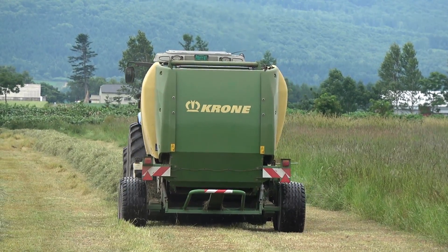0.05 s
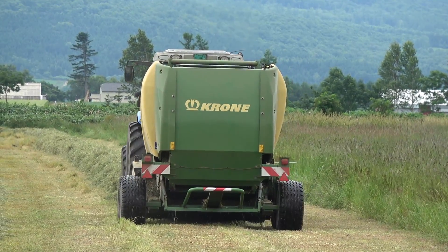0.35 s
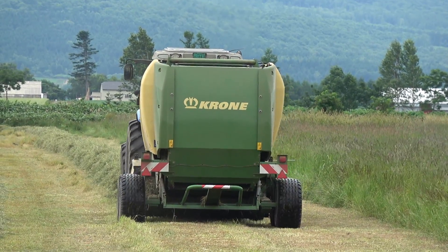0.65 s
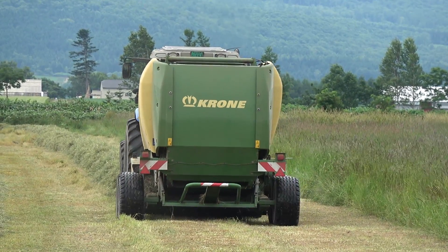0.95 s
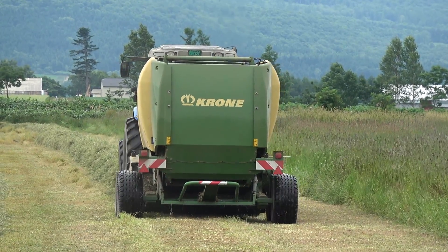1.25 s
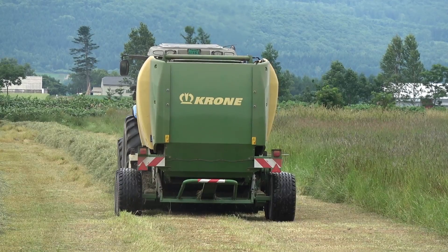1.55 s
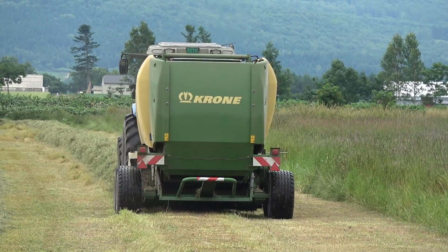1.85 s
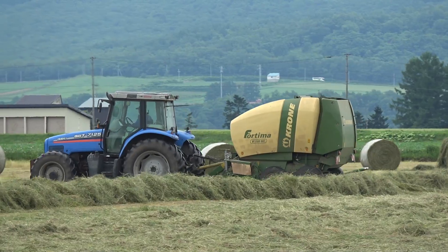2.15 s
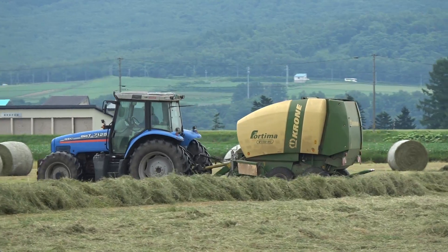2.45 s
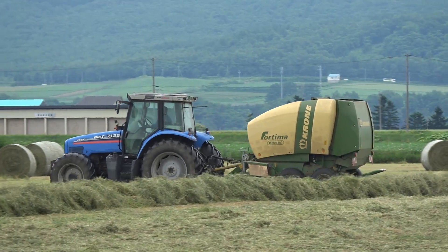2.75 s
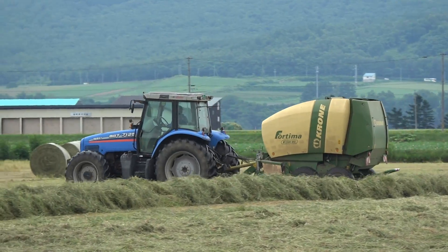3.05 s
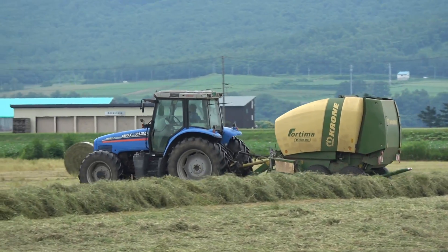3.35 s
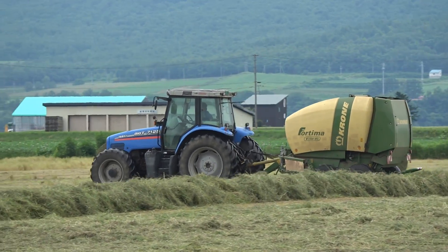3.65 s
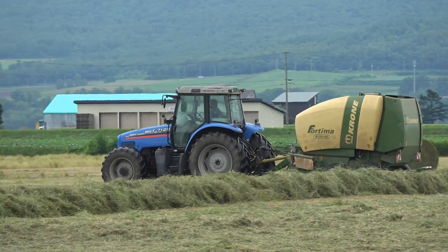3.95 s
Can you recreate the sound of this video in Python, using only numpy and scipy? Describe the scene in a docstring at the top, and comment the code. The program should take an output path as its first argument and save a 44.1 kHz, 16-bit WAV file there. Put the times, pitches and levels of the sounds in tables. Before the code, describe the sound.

A hay baler rattles in a fast, steady beat behind a droning tractor, with ringing steel and booming panels. After a sudden cut, the diesel runs more distantly with fan noise and a fading whine, while wind buffets the microphone.

```python
"""You hear steel clattering in a steady beat, rustling hay, a droning diesel and thumps of wind.
A six-cylinder tractor pulls a round baler, first heard from close behind, then, after a cut, from the
side and farther off. The baler's chain and slats rattle its frame and ring its steel; links jangle and
a panel booms. The diesel knocks each time a cylinder fires. Gusts buffet the two microphone ports."""
import sys
import numpy as np
from scipy import signal
from scipy.fft import rfft, irfft
from scipy.io import wavfile
from scipy.ndimage import uniform_filter1d, minimum_filter1d

SR = 44100
rng = np.random.default_rng(int(sys.argv[2]) if len(sys.argv) > 2 else 0)


def wrap_up_sound(samples):
    """Save the sound to the file named by the first command line argument, as 16-bit audio."""
    columns = np.atleast_2d(samples).T
    # keep every value between -1 and 1, then stretch to whole-number steps
    tamed = np.clip(columns, -1, 1)
    steps = np.round(tamed * 32767).astype(np.int16)
    wavfile.write(sys.argv[1], SR, steps)


N = 176400

CUT_S, RESUME_S = 2.018, 2.031  # the view from behind ends, the side view begins
FIRING_BEHIND_HZ, FIRING_SIDE_HZ = 99.05, 99.27  # cylinder firings per second

# Levels in the tables are relative: the functions set how loud each layer ends up.
# ringing notes of the steel chain and slats: f/Hz, width/Hz, level/dB
STEEL = [(2385, 45, -5.5), (4045, 60, -1), (4105, 60, -2), (4290, 170, -10), (4535, 45, -7),
         (5080, 120, -16), (8546, 20, -25), (9030, 40, -28)]
# stereo width of the side view: f/Hz, left-right difference/dB
WIDTH_SIDE = [(200, 12), (1200, -42), (2200, -26), (4000, -12.5), (5500, -10.5), (7000, -2), (9000, 0),
              (12000, 3), (15000, 0)]


def undb(db):
    """Turn decibels into a factor to multiply by."""
    return 10 ** (np.asarray(db) / 20)


def unit(x):
    """Scale a signal to an average power of 1."""
    return x / np.sqrt(np.mean(x ** 2))


def clock():
    """The time of each sample in seconds."""
    return np.arange(N) / SR


def curves(table):
    """Join a table's points with straight lines in time, one curve for each column after the first."""
    rows = np.array(table, float)
    return [np.interp(clock(), rows[:, 0], col) for col in rows.T[1:]]


def bins():
    """The frequency of each slot in the spectrum, at least 1 Hz."""
    return np.maximum(np.arange(N // 2 + 1) * SR / N, 1)


def colour(x, points):
    """Shape a sound's tone with a curve of points: f/Hz, level/dB."""
    hz, db = np.array(points, float).T
    return irfft(rfft(x) * undb(np.interp(np.log(bins()), np.log(hz), db)), N)


def split(x, hz):
    """The parts of a sound below and above a frequency."""
    low = irfft(rfft(x) / (1 + (bins() / hz) ** 6), N)
    return low, x - low


def ring(x, modes):
    """Make an object ring: each of its notes is pushed by the part of x near that pitch."""
    out = 0
    for hz, width, db in modes:
        pole = np.exp((2j * np.pi * hz - np.pi * width) / SR)  # a narrower note rings longer
        band = signal.butter(2, [.86 * hz, min(1.12 * hz, .45 * SR)], "band", fs=SR, output="sos")
        push = signal.sosfilt(band, x)
        out = out + undb(db) * unit(signal.lfilter([1], [1, -2 * pole.real, abs(pole) ** 2], push))
    return unit(out)


def walk(rate):
    """A smooth random drift of typical size 1; a higher rate in Hz wobbles faster."""
    return unit(irfft(rfft(rng.standard_normal(N)) * np.exp(-(bins() / rate) ** 2), N))


def grit(spread_db):
    """Dense tiny clicks of uneven size."""
    return unit(rng.standard_normal(N) * undb(spread_db * np.minimum(rng.exponential(size=N), 7)))


def hiss_band(hz, width_hz):
    """A band of noise whose centre follows the curve hz."""
    shape = np.exp(-np.log(2) * (2 * bins() / width_hz) ** 2)
    band = irfft(rfft(rng.standard_normal((2, N))) * shape, N)
    shift_up = np.exp(2j * np.pi * np.cumsum(hz) / SR)
    return unit(np.real((band[0] + 1j * band[1]) * shift_up))


def wavering_tone(hz, waver, rate):
    """A pure tone whose pitch drifts by about the fraction waver."""
    return np.sqrt(2) * np.sin(2 * np.pi * np.cumsum(hz * (1 + waver * walk(rate))) / SR)


def strikes(table, decay_s, column=1, rise_s=0.0037):
    """A loudness curve that jumps up and dies away at each time in a table."""
    loudness = np.zeros(N)
    for row in table:
        age = np.maximum(clock() - row[0], 0)
        loudness += undb(row[column]) * (1 - np.exp(-age / rise_s)) * np.exp(-age / decay_s)
    return loudness


def stereo(mid, side, width):
    """Left and right: both get mid, while side is shaped by width, then added or taken away."""
    return mid + colour(side, width) * np.array([[1], [-1]])


def wind(gusts, spectrum, gain_db, shared, flutter_db):
    """Swirls of air thump each microphone port; strong gusts swell the deep bass most."""
    level_db, pan_db = curves(gusts)
    swirls = np.sqrt(1 - shared) * rng.standard_normal((2, N)) + np.sqrt(shared) * rng.standard_normal(N)
    low, high = split(unit(colour(swirls * undb(flutter_db * walk(40)), spectrum)), hz=110)
    swell = np.sqrt(uniform_filter1d((low + high) ** 2, SR // 8, axis=1))
    high = high.mean(axis=0) + 0.29 * (high - high.mean(axis=0))  # more alike at both ports
    usual_db = np.median(np.array(gusts)[:, 1])
    air = low / swell + high * undb(2.5 - 0.21 * (level_db - usual_db))
    return air * undb(level_db + gain_db + 0.43 * np.array([pan_db, -pan_db]))


def pickup():
    """Wads of hay swish into the baler, a little differently in each ear."""
    # swishes of hay: t/s, level/dB
    swishes = [(2.2, -70), (2.73, -60), (3.42, -62), (3.51, -60), (3.9, -66)]
    hiss = [hiss_band(np.full(N, 7500), width_hz=4500) for _ in range(2)]
    return stereo(*hiss, WIDTH_SIDE) * uniform_filter1d(strikes(swishes, decay_s=0.063), SR // 30)


def drive_line():
    """The turning drive line makes a hum and a rough whine that fade once the tractor has gone by."""
    # loudness of the drive line: t/s, hum/dB, whine/dB
    levels = [(2.03, -60, -50), (2.25, -52.5, -50), (2.62, -53, -52), (2.9, -63, -59), (4, -65, -68)]
    hum_db, whine_db = curves(levels)
    hum = wavering_tone(hz=705, waver=.008, rate=25) * undb(hum_db + 2 * walk(16))
    whine = undb(whine_db) * hiss_band(np.full(N, 2150), width_hz=230)
    return hum + whine


def engine_drone(firing_hz, column, waver):
    """Low tones of the engine and drive, all locked to the turning crankshaft."""
    # engine tones: multiple of the firing rate, level behind/dB, level from the side/dB
    tones = [(1, -44, -43), (4 / 3, -39.5, -42), (7 / 3, -43, -51), (3.5, -50, -60), (6, -64, -63),
             (7, -60, -62), (9, -64, -63), (11.5, -56, -63)]
    phase = 2 * np.pi * np.cumsum(firing_hz * (1 + waver * walk(5.7))) / SR
    out = 0
    for row in tones:
        strength = np.sqrt(2) * undb(row[column] + 2 * walk(7.5))
        out += strength * np.sin(row[0] * phase + rng.uniform(0, 2 * np.pi))
    return out


def diesel_knock(firing_hz, decay):
    """A pulse at every firing, dying away before the next; each cylinder has its own strength."""
    firings = np.cumsum(firing_hz * (1 + 0.0012 * walk(3.4))) / SR
    cylinders = undb(2.9 * rng.standard_normal(size=6))
    return unit(np.exp(-(firings % 1) / decay) * cylinders[firings.astype(int) % len(cylinders)])


def tractor():
    """From the side: the diesel knocks over fan and machine noise, changing tone as the rig moves by."""
    # tone of the diesel's noise: f/Hz, level/dB
    diesel_tone = [(190, -39), (330, -18), (427, -8), (560, -2.5), (692, -5.5), (800, -5.5), (1040, -1),
                   (1680, -5.5), (2170, -5.5), (3150, -10), (4780, -14.5), (10500, -34.5), (15500, -37.5)]
    # the passing rig in four bands, low to high: t/s, body/dB, middle/dB, upper/dB, treble/dB
    passing = [(2.03, -0.5, -2, 8, -0.5), (2.4, -1, -4, 6.5, -0.5), (2.62, -1, -5, 5.5, -1.5),
               (2.85, -1.5, -2, 5, 0), (3.15, -1, 1.5, -4, -0.5), (3.45, -0.5, 2.5, 0, -2),
               (3.7, -0.5, 2, 1, -1.5), (4, 0.5, 3, -2, -2)]
    # two gliding bands of hiss: t/s, lower f/Hz, lower level/dB, upper f/Hz, upper level/dB
    glide = [(2.03, 2560, -63, 4690, -57), (2.45, 2550, -56.5, 4720, -57), (2.8, 2695, -54, 4730, -67),
             (3.1, 2780, -55.5, 4750, -70), (3.4, 2196, -52.5, 5203, -56), (3.7, 2195, -57.5, 5400, -62.5),
             (4, 2100, -55.5, 6100, -55.5)]
    # two bands of fan roar: t/s, upper f/Hz, upper level/dB, lower f/Hz, lower level/dB
    fan_bands = [(2.03, 1200, -58, 800, -57), (2.4, 1150, -53, 800, -55), (2.55, 1082, -49, 800, -57),
                 (2.8, 1078, -50.5, 820, -52), (3.05, 1104, -62, 850, -54), (3.5, 1130, -60, 950, -66),
                 (3.75, 1082, -50.5, 1020, -54), (4, 1227, -48, 980, -57)]
    body_db, middle_db, upper_db, treble_db = curves(passing)
    low_hz, low_db, high_hz, high_db = curves(glide)
    fan_hz, fan_db, roar_hz, roar_db = curves(fan_bands)
    knock = diesel_knock(FIRING_SIDE_HZ, decay=.4)
    beat = unit(np.sqrt(1 + .18 * knock ** 2)) * undb(.45 * walk(30))
    pair = []
    for _ in range(2):  # mid, then side
        body, rest = split(unit(colour(grit(spread_db=-1.0) * beat, diesel_tone)), hz=1150)
        middle, rest = split(rest, hz=2000)
        upper, treble = split(rest, hz=3400)
        diesel = (body * undb(body_db) + middle * undb(middle_db - 4.0)
                  + upper * undb(upper_db - 7.0) + treble * undb(treble_db + 1.0))
        hiss = undb(low_db + 3.5) * hiss_band(low_hz, width_hz=1080)
        hiss += undb(high_db) * hiss_band(high_hz, width_hz=890)
        fan = undb(fan_db) * hiss_band(fan_hz, width_hz=390)
        fan += undb(roar_db) * hiss_band(roar_hz, width_hz=250)
        pair.append(undb(-42.5) * diesel + beat * (hiss + fan))
    return stereo(*pair, WIDTH_SIDE) + engine_drone(FIRING_SIDE_HZ, column=2, waver=0.00093)


def panel_booms(shake):
    """Shaking keeps the bale chamber ringing; now and then its big panel booms on an unsteady note."""
    # notes of the chamber and its panels: f/Hz, width/Hz, level/dB
    panels = [(136, 20, -2), (195, 35, 0), (234, 16, -2), (266, 20, -2), (703, 35, -7), (754, 20, -8),
              (850, 50, -11), (1143, 30, -8), (1890, 30, -19)]
    # booms of the big panel: t/s, level/dB
    booms = [(.025, -26), (.725, -29), (.985, -27), (1.16, -22.5), (1.485, -25.5), (1.615, -28),
             (1.92, -25)]
    chamber = undb(-34.5) * ring(rng.standard_normal(N) * shake, panels)
    note = wavering_tone(hz=234, waver=.02, rate=10)
    return chamber + undb(2.5) * note * strikes(booms, decay_s=.04, rise_s=.02)


def jangles():
    """Links strike and bounce twice; each contact rings three steel notes, a little off pitch."""
    # jangling strokes of the chain: t/s, low note/dB, middle note/dB, high note/dB
    strokes = [(.006, -37, -37, -39), (.132, -35, -34, -50), (.276, -45, -34, -36), (.315, -50, -41, -47),
               (.348, -34, -42, -52), (.435, -44, -42, -42), (0.657, -36, -48, -58), (0.796, -33, -36, -50),
               (.872, -39, -37, -48), (.945, -33.5, -42, -50), (1.027, -41, -46, -41),
               (1.108, -30.5, -40.5, -36), (1.169, -38, -40, -44), (1.244, -37, -40, -39),
               (1.38, -36, -54, -49), (1.455, -39, -45, -40), (1.527, -38, -37, -54),
               (1.686, -45, -50, -38), (1.76, -42, -50, -40), (1.826, -40, -47, -44),
               (1.908, -45, -45, -47), (1.978, -45, -50, -39)]
    decay_s, bounce_s, bounce_db = .026, .011, -1.5
    out, age = np.zeros(2 * N), clock()[:SR // 5]
    for start, *levels in strokes:
        for bounce in range(3):
            first = int((start + bounce * bounce_s * rng.uniform(.7, 1.3)) * SR)
            fade = undb(bounce * bounce_db - 2.5) * np.exp(-age / decay_s)
            notes = (STEEL[1 + bounce % 2], *STEEL[3:5])
            for (hz, width, _), db in zip(notes, levels):
                pitch_hz = hz + .4 * width * rng.standard_normal()
                note = np.sin(2 * np.pi * (pitch_hz * age + rng.random()))
                out[first:first + len(age)] += undb(db) * note * fade
    return out[:N]


def chain_blows():
    """The force of chain links landing, four to a slat, each blow dying away quickly."""
    # the four links in one slat beat: level/dB
    link_db = [0, -1.5, -8, -11]
    slat_hz, first_slat_s, decay_s = 13.6, -0.0105, .027
    link_scatter_db, slat_scatter_db, scatter_s = 1.0, .9, 0.00079
    force, t = np.zeros(N), clock()
    chance = rng.standard_normal((128, 3))  # one row for each blow
    for k in range(len(chance)):
        slat, link = divmod(k, len(link_db))
        start = first_slat_s + k / len(link_db) / slat_hz + scatter_s * chance[k, 0]
        span = slice(max(int(start * SR), 0), max(int(start * SR) + SR // 10, 0))
        db = link_db[link] + link_scatter_db * chance[k, 1] + slat_scatter_db * chance[slat, 2]
        force[span] += undb(db) * np.exp(-(t[span] - start) / decay_s)
    return force / np.sqrt(np.mean(force[:N // 2] ** 2))


def baler():
    """Close behind: chain blows rattle the frame and ring the steel, panels boom and hay rustles."""
    # tone of the rattling frame: f/Hz, level/dB
    frame_tone = [(180, -35), (300, -0.5), (343, -1), (486, -2), (649, -2), (719, 1.5), (1060, 0.5),
                  (1150, 0.5), (1600, -6.5), (1890, -4.5), (2390, -7.5), (2650, -9), (3500, -15.5),
                  (4550, -76), (7700, -120)]
    # tone of the hay in the chamber: f/Hz, level/dB
    hay_tone = [(2500, -40), (3700, 5), (5000, 1), (6000, -1.5), (7000, -4), (8200, -8), (9200, -10.5),
                (10400, -16.5), (12000, -17.5), (13200, -23.5), (15500, -26)]
    # load on the baler: t/s, low clatter/dB, high rattle/dB, hay rustle/dB
    load = [(0, -31.5, -29.5, -49), (.15, -32.5, -31, -49), (.3, -31.5, -32.5, -52),
            (.55, -33.5, -31.5, -53), (.75, -33.5, -34, -51.5), (.92, -34.5, -32, -49),
            (1.15, -32.5, -34, -48.5), (1.35, -34.5, -35, -51.5), (1.6, -33.5, -35.5, -52),
            (1.85, -36, -36.5, -53.5), (2, -36, -33.5, -52.5)]
    # heavier knocks in the chamber: t/s, low clatter/dB, high rattle/dB
    knocks = [(.122, -23, -31), (.295, -33, -33), (.372, -27.5, -28), (.588, -42, -29), (.738, -27, -42),
              (.803, -32, -28.5), (1.108, -33, -27), (1.178, -27, -35)]
    # steady ringing of the chain: t/s, level/dB
    ringing = [(0, -41.5), (.3, -42), (.55, -44.5), (.85, -44.5), (1.15, -43), (1.4, -45.5), (1.6, -44),
               (1.8, -43.5), (2, -42.5)]
    # sharp chinks of the chain: t/s, level/dB
    chink_hits = [(.005, -58), (.06, -59), (.08, -55), (.14, -57), (.275, -62), (.795, -57), (.884, -59),
                  (.945, -59), (1.034, -54), (1.094, -57), (1.164, -57), (1.682, -61), (1.754, -61),
                  (1.834, -61), (1.911, -60)]
    # notes of a chink: f/Hz, width/Hz, level/dB
    chink_notes = [(11300, 300, 0), (11850, 350, -7)]
    clatter_db, rattle_db, hay_db = curves(load)
    steel_db, = curves(ringing)
    blows = chain_blows()
    engine = diesel_knock(FIRING_BEHIND_HZ, decay=.3)
    shake = unit(np.sqrt(1 + .4 * blows ** 2 + .03 * engine ** 2)) * undb(.8 * walk(25))
    rustle = unit(np.sqrt(1 + .04 * blows ** 2)) * undb(.6 * walk(40))
    clatter = np.hypot(undb(clatter_db - 0.46), strikes(knocks, decay_s=0.027))
    rattle = np.hypot(undb(rattle_db - 1.2), strikes(knocks, decay_s=0.027, column=2))
    chink_level = undb(-73.5) * blows + strikes(chink_hits, decay_s=.018) * undb(2 * walk(90))
    pair = []
    for _ in range(2):  # mid, then side
        low, high = split(unit(colour(grit(spread_db=0.5) * shake, frame_tone)), hz=1510)
        frame = low * clatter + high * rattle
        hay = unit(colour(grit(spread_db=3.0) * rustle, hay_tone))
        steel = unit(sum(undb(note[2]) * ring(grit(spread_db=2.5) * blows, [note]) for note in STEEL))
        chinks = chink_level * ring(grit(spread_db=4.5), chink_notes)
        pair.append(frame + hay * undb(hay_db + 5.5) + steel * undb(steel_db - 1.5) + chinks)
    # stereo width from behind: f/Hz, left-right difference/dB
    width = [(200, -48), (1200, -70), (2200, -27.5), (4000, -18.5), (5500, -11), (7000, -8.5), (9000, -5),
             (12000, -3), (15000, 1)]
    machine = stereo(*pair, width) + panel_booms(shake) + jangles()
    return machine + engine_drone(FIRING_BEHIND_HZ, column=1, waver=0.0043)


def scene():
    """The view from behind, a brief gap, then the view from the side, all over a faint rumble."""
    # gusts on the microphone in each view: t/s, level/dB, lean to the left/dB
    gusts_behind = [(0.0, -25, 1), (0.19, -29, -1), (0.22, -19, 2), (0.25, -30, 0), (0.46, -16, -0.5),
                    (0.62, -21.5, 3), (0.65, -16.5, -8), (0.79, -19.5, -3), (0.82, -18.5, -8),
                    (0.86, -25, 1), (0.93, -19.5, 1.5), (0.96, -27.5, -7), (1.13, -29, 8.5),
                    (1.19, -23, -13), (1.28, -27.5, 4), (1.33, -31, -4), (1.36, -30, -2), (1.41, -35.5, 1),
                    (1.44, -28, 3), (1.51, -29, -4), (1.54, -21, -11), (1.58, -25.5, -3), (1.82, -20, 0.5),
                    (1.87, -13, -1), (1.95, -21, 1), (2.01, -15.5, 1)]
    gusts_side = [(2.04, -70, -5), (2.056, -22, -7.5), (2.11, -25, 6.5), (2.22, -28.5, 2.5),
                  (2.344, -25, 0), (2.606, -34, 5), (2.646, -21, 5), (2.722, -30.5, 1),
                  (2.836, -21.5, -1.5), (2.858, -20, 4.5), (3.104, -27, 2.5), (3.12, -40, 10),
                  (3.164, -26, -1), (3.278, -27.5, 2.5), (3.36, -32.5, 0), (3.448, -24, -1.5),
                  (3.514, -30.5, -2), (3.666, -25.5, 3), (3.792, -34.5, 1), (3.818, -27.5, -1),
                  (3.912, -32.5, 1.5), (4.0, -29.5, 1)]
    # tone of the wind in each view: f/Hz, level/dB
    wind_behind = [(8, -34), (20, 3.5), (33, -1.5), (60, -1.5), (100, -11), (160, -17), (250, -28),
                   (400, -38), (800, -54), (2000, -109)]
    wind_side = [(8, -53), (20, -1.5), (33, 6), (60, -4.5), (100, -9.5), (160, -16), (250, -27.5),
                 (400, -43.5), (800, -43), (2000, -112)]
    behind = baler() + wind(gusts_behind, wind_behind, gain_db=4, shared=0.31, flutter_db=0.0)
    beside = tractor() + drive_line() + pickup()
    beside += wind(gusts_side, wind_side, gain_db=4.5, shared=0.19, flutter_db=0.5)
    rumble = undb(-50) * unit(colour(rng.standard_normal(N), wind_behind))
    t, fade_s = clock(), .002
    behind_on = np.clip((CUT_S - t) / fade_s, 0, 1)
    beside_on = np.clip(np.minimum(t - RESUME_S, t[-1] - t) / fade_s, 0, 1)
    return rumble + behind * behind_on + beside * beside_on


def record(dry):
    """The recorder turns down the strongest gusts and steeply cuts the highest treble."""
    ceiling, top_hz = .8, 15730
    peak = np.maximum(abs(dry).max(axis=0), 1e-6)
    safe_gain = np.minimum(1, ceiling / peak)
    smooth_gain = uniform_filter1d(minimum_filter1d(safe_gain, SR // 100), SR // 100)
    treble_cut = signal.ellip(12, .1, 90, top_hz, fs=SR, output="sos")
    return signal.sosfilt(treble_cut, dry * smooth_gain)


dry = scene()
out = record(dry)
wrap_up_sound(out)
```